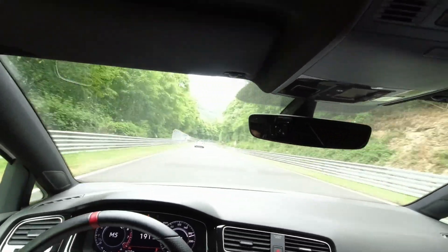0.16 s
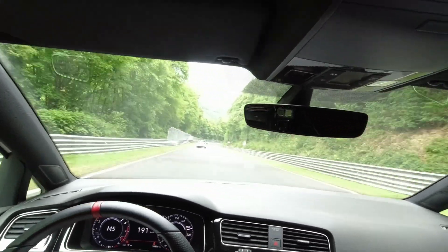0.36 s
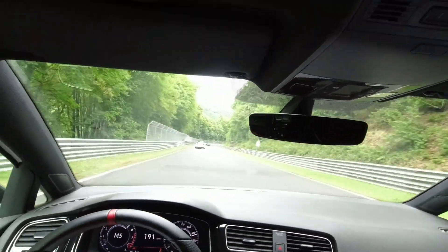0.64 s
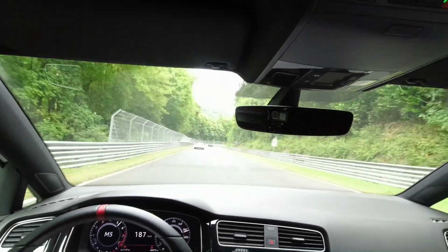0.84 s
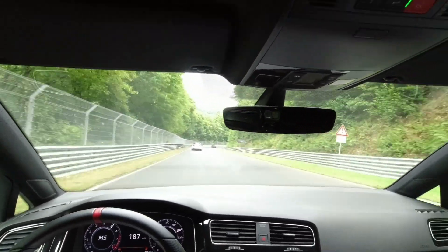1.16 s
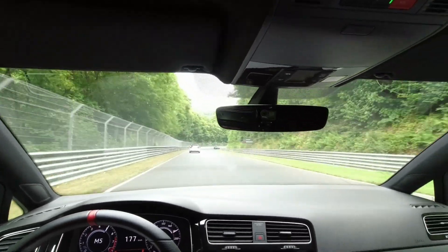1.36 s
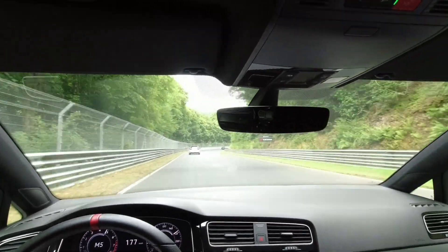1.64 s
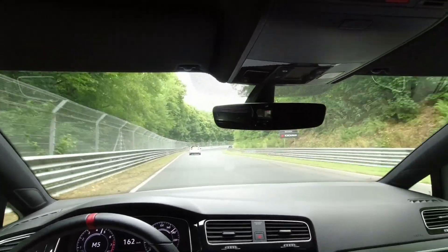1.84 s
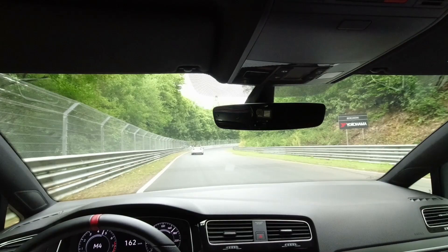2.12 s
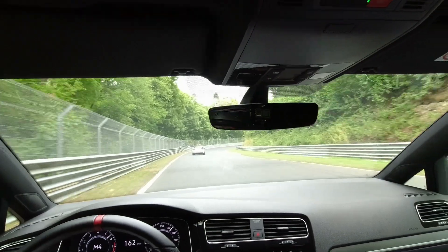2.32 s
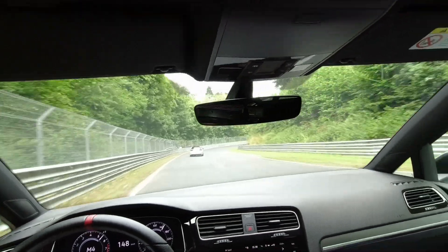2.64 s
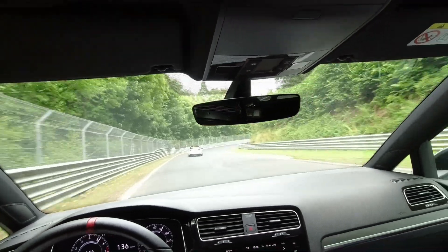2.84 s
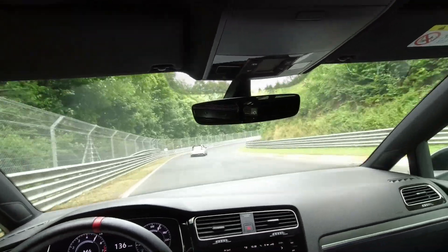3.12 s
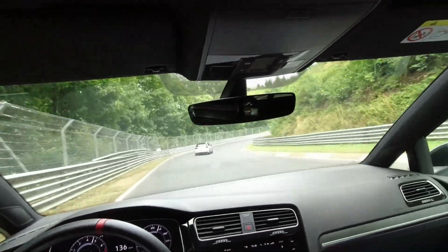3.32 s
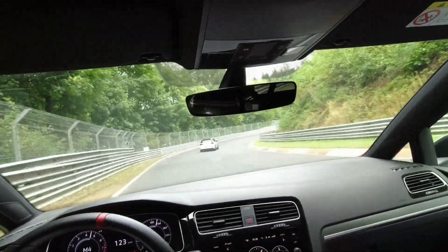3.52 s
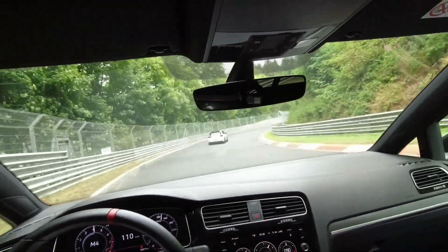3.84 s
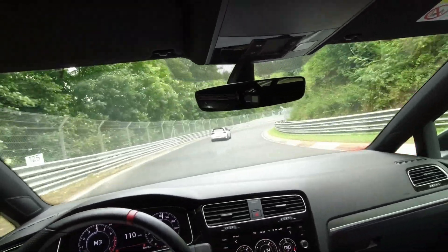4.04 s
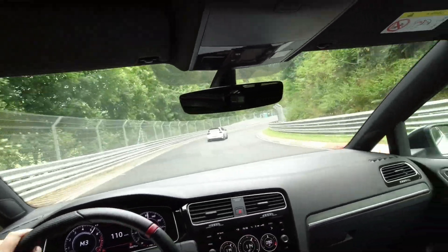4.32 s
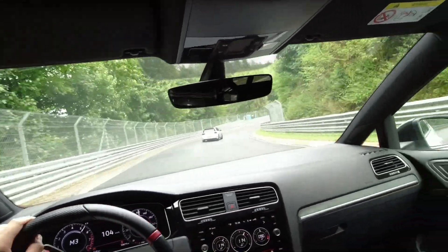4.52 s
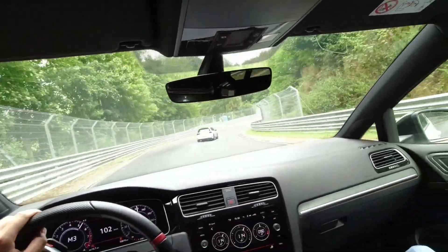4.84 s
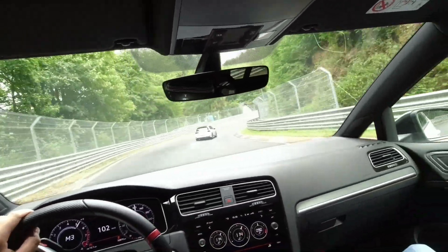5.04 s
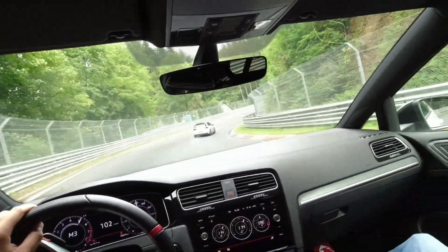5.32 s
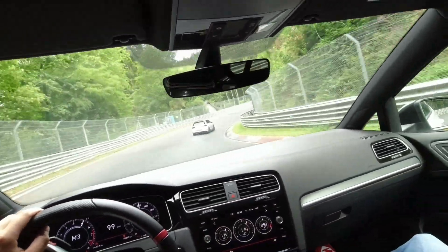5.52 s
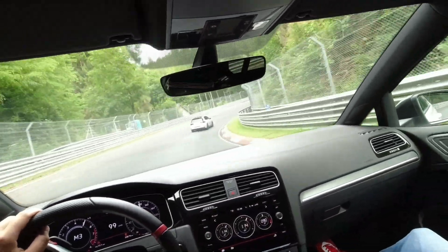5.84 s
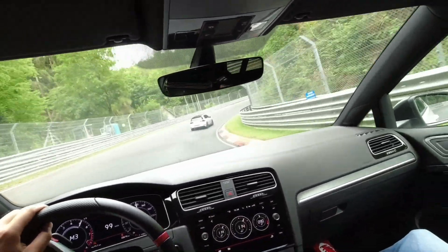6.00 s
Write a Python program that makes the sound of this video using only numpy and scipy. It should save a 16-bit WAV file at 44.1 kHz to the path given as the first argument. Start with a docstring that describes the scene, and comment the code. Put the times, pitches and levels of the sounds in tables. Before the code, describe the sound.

Heard from a car cabin: engine drones at speed, drops into braking, rises through two downshifts, then tyres howl in a bend amid rattling trim.

```python
"""Inside a four-cylinder turbo car on a racetrack: first full throttle, with a droning panel and thin high tones.
The driver lifts off and brakes hard, and two downshifts pull the engine speed up. In a bend the tyres howl as
their tread sticks and slips, and the throttle opens again. The engine is a sum of wavering tones tied to the
crankshaft. All along, coloured noise makes road rumble and wind, bumps boom and loose trim rattles."""
import sys
import numpy as np
from scipy import signal
from scipy.fft import rfft, irfft, next_fast_len
from scipy.io import wavfile
from scipy.ndimage import map_coordinates

SR = 44100
rng = np.random.default_rng(int(sys.argv[2]) if len(sys.argv) > 2 else 0)


def waveform_to_disk(signal):
    """Save audio, clipped to [-1, 1], as 16-bit WAV at the path in sys.argv[1]."""
    frames = np.transpose(np.atleast_2d(signal))
    scaled = np.clip(frames, -1, 1) * 32767
    samples = np.round(scaled).astype(np.int16)
    wavfile.write(sys.argv[1], SR, samples)


N = 272097  # length in samples

# Road speed. Each row: time in seconds, speed in km/h.
ROAD_SPEED = [(0, 189.1), (.43, 191.1), (.5, 188), (1.2, 179.1), (1.85, 160.9), (2.6, 146.1), (2.9, 136.9),
              (3.3, 125.6), (3.75, 120), (4.25, 116.5), (5.4, 106), (5.95, 107.5), (6.17, 111.8)]
TOP_KMH = 190
TOP_GEAR = .477  # crankshaft turns a second per km/h
# Each row: start in seconds, crankshaft turns a second per km/h in the new gear.
GEAR_CHANGES = [(2.25, .623), (4.05, .785)]
SHIFT_S = .18  # time in which the engine is pulled up to the new gear

# Throttle pedal: times in seconds, then loudness in relative dB when wide open, shut, and part open.
LIFT_OFF, CLOSING_S, BACK_ON, OPENING_S = .43, 0.07, 5.39, 0.46
FULL_DB, SHUT_DB, PART_DB = -45, -78.5, -54
# Loudness of engine braking. Each row: time in seconds, relative dB.
ENGINE_BRAKING = [(.43, -69), (.5, -56), (1.0, -53.5), (1.2, -50), (1.7, -53), (1.9, -55.5), (2.42, -53.5),
                  (2.55, -54), (2.75, -62), (2.95, -62), (3.02, -47), (3.22, -46), (3.3, -58), (3.4, -72),
                  (3.75, -55.5), (4.25, -56.5), (5.0, -60), (5.7, -53.5), (5.95, -73)]

# Wind rushing past. Each row: frequency in Hz, relative dB per Hz.
RUSH_SPECTRUM = [(350, -31), (600, -4), (702, -7.5), (837, -0.5), (896, -2.5), (1010, -3), (1120, -4),
                 (1230, -8.5), (1500, -10), (1730, -15.5), (2260, -19.5), (3050, -36), (3960, -37),
                 (6710, -120)]
# Wind hissing at the seals. Each row: frequency in Hz, relative dB per Hz.
HISS_SPECTRUM = [(1500, -32.5), (2600, -0.5), (3200, -6), (4000, -12.5), (5000, -16.5), (6300, -25.5),
                 (8000, -28), (9500, -27), (11000, -35.5), (12800, -37), (13300, -48.5), (15500, -51)]
# Base level at top speed, and loss each time the speed halves, both in dB.
ROAR_DB, ROAR_LOSS_DB, RUSH_DB, RUSH_LOSS_DB, HISS_DB, HISS_LOSS_DB = -35.5, 3.5, -48, 5.5, -67, 5.5
BOOST_DB = 8  # extra hiss at the very start, gone by lift-off
BEND, TURN_IN_S = 4.54, 0.36  # the bend: start and rise in seconds
BEND_RUSH_DB, BEND_ROAR_DB = 3.5, 1.5  # gains in the bend: wind rush, and roar of the loaded tyres

# What the road surface shakes. Each row: time in seconds, chassis level in dB, cabin boom level in dB.
ROAD_SHAKE = [(.05, -25, -32.5), (.31, -38, -31), (.41, -32, -41), (.55, -35.5, -48), (.75, -33.5, -37),
              (1.0, -29, -32.5), (1.13, -41.5, -36.5), (1.5, -38, -36.5), (2.37, -37, -36.5),
              (2.65, -35, -31.5), (2.89, -37, -38), (3.92, -35.5, -37), (4.35, -42, -41), (5.24, -36, -41),
              (5.5, -38.5, -42), (6.17, -43, -42.5)]
# Shaken chassis. Each row: frequency in Hz, relative dB per Hz.
CHASSIS_SPECTRUM = [(8.8, -33), (15, -4.5), (32, 0.5), (59, -6.5), (90, -9.5), (120, -36), (200, -120)]
# Booming cabin air. Each row: frequency in Hz, relative dB per Hz.
BOOM_SPECTRUM = [(35, -37), (60, -18.5), (91, 3.5), (124, -3), (150, -13.5), (200, -45), (330, -120)]
# Tyre roar. Each row: frequency in Hz, relative dB per Hz.
ROAR_SPECTRUM = [(68, -22.5), (115, -1), (151, -1.5), (177, -2), (248, -9.5), (279, -13.5), (345, -11),
                 (394, -12), (491, -16.5), (539, -20.5), (621, -31), (750, -31.5), (980, -66), (1650, -120)]
# Ringing body panels, passed twice. Each row: frequency in Hz, width of one pass in Hz, dB of one pass.
PANEL_MODES = [(144.2, 12, -1), (198.4, 9, -1), (245.3, 18, -2.5), (344.7, 14, -4), (420.4, 4.2, -4),
               (833.4, 34, -8.5)]
ROAR_FOLLOWS = .3  # share of the chassis level swings (in dB) that the tyre roar follows

# Bumps that ring the body. Each row: start in seconds, length in seconds, first Hz, last Hz, peak dB.
BODY_BUMPS = [(0.017, 0.018, 28, 27.2, -35), (.1, 0.16, 112.4, 111.5, -24),
              (0.348, 0.073, 103.2, 101.2, -21), (0.367, 0.087, 30.5, 30.1, -32),
              (0.702, .1, 99.2, 100, -30), (.882, 0.033, 99, 103.5, -15), (0.883, 0.19, 103.6, 102, -14.5),
              (0.935, 0.023, 27.9, 28.3, -17), (1.001, 0.033, 29.8, 30, -15),
              (1.12, 0.25, 139.8, 140.7, -33), (1.72, 0.17, 153.2, 150.8, -30),
              (1.85, 0.22, 146.3, 151.6, -26.5), (2.082, 0.28, 198.8, 199.5, -37.5),
              (2.48, 0.2, 112, 90, -25), (2.63, 0.17, 196.4, 200.5, -39.5),
              (2.721, 0.067, 30.2, 30.3, -25.5), (3.05, 0.14, 109, 111.4, -34),
              (3.11, 0.3, 139.8, 133.3, -35.5), (3.48, 0.13, 76.6, 115, -27),
              (3.58, 0.099, 138.4, 152, -31.5), (3.901, 0.12, 97.4, 92.6, -44.5),
              (5.148, 0.19, 102.3, 101.4, -33), (5.435, 0.05, 172.6, 174, -26),
              (5.447, 0.033, 367, 353, -30), (5.457, 0.039, 29.4, 29.6, -21.5),
              (5.5, 0.028, 178, 183, -27.5)]

# Trim rattles. Each row: start in seconds, then strength of clack, knock and tinkle in relative dB.
TRIM_RATTLES = [(0.462, -51, -58.5, -70), (0.868, -61, -66, -94.5), (1.002, -58, -66, -91.5),
                (2.419, -56.5, -56.5, -73), (2.793, -55, -58.5, -85), (2.827, -57.5, -65.5, -70),
                (2.928, -37.5, -58, -77.5), (2.961, -49.5, -69, -90), (2.996, -54.5, -68.5, -85),
                (3.334, -55.5, -66, -84), (3.6334, -55.5, -48.5, -84.5), (3.66, -66, -55, -90),
                (3.705, -72, -58, -93), (3.98, -65, -69, -85), (4.257, -73, -70, -76),
                (4.768, -71, -66, -73.5), (4.847, -58, -54, -86), (4.8774, -59.5, -53.5, -74),
                (5.007, -66, -56.5, -73.5), (5.1213, -61.5, -60, -75.5), (5.132, -53, -51.5, -81),
                (5.343, -77.5, -62, -74.5), (5.385, -63.5, -61.5, -73), (5.422, -63, -47, -81),
                (5.433, -45, -38, -58.5), (5.465, -59.5, -47.5, -83.5), (5.492, -62, -55, -89),
                (5.871, -68.5, -70, -85)]
# Clacking trim, before extra damping. Each row: frequency in Hz, width in Hz, relative dB.
CLACK_MODES = [(2470, 400, -12), (3002, 26, 4), (3455, 50, 7), (3650, 900, -8), (3812, 30, 10),
               (3990, 28, 6), (4675, 45, 2), (5191, 30, 3), (5444, 32, 1), (6200, 700, -14),
               (7000, 900, -27), (8600, 900, -25)]
# Knocking trim, before extra damping. Each row: frequency in Hz, width in Hz, relative dB.
KNOCK_MODES = [(700, 390, 1), (1100, 400, 4.5), (1520, 130, 8), (1620, 77, 15.5), (1825, 66, 13),
               (2070, 74, 5.5), (2480, 320, 10), (3000, 200, 11.5), (3400, 160, 5), (4100, 250, 0),
               (4700, 150, -3), (5063, 34, 5.5), (5450, 150, -7)]
# Light tinkling trim. Each row: frequency in Hz, width in Hz, relative dB.
TINKLE_MODES = [(7640, 630, 2), (8850, 720, 6.5), (9150, 340, 15), (10640, 710, 4), (12300, 900, -5.5),
                (14400, 900, -4.5)]
# Shake time in seconds at a knock of -69 dB; it grows by about this share for each dB more.
RATTLE_S, RATTLE_GROWS = 0.04, 0.01

# Slides of the tread. Each row: start in seconds, length in seconds, first Hz, last Hz, level in dB.
TYRE_SLIDES = [(4.602, .15, 815, 822, -51), (4.783, .13, 825, 892.5, -46.5), (5.02, .35, 812, 841, -48),
               (5.369, .27, 868.5, 891, -47.5), (5.633, .21, 898.6, 925.5, -45),
               (5.824, 0.33, 1010, 1032, -51.5)]
BITE_S, GROWS_DB, LET_GO_S = 0.05, 1.5, 0.033  # a slide starts, grows over its length, and stops

# Crankshaft tones. Each row: multiple of crank speed, relative dB under throttle, relative dB when braking.
CRANK_ORDERS = [(2, -9, -10.5), (3, -5, -9.5), (3.5, -3, -16), (4, -2.5, -16.5), (4.5, -10.5, -12.5),
                (5, -13, -12.5), (5.5, -9, -13), (6, -8, -2), (6.5, -14, -27), (7, -2, -21.5),
                (8, -10.5, -26.5), (9, -11.5, -27), (10, -7, -32.5), (11.2, -4, -32), (13.5, -13.5, -36.5)]
# Bulkhead resonances, passed twice. Each row: frequency in Hz, width of one pass in Hz, dB of one pass.
BULKHEAD_MODES = [(185, 107, 0), (328.3, 44.6, 3.5), (464.3, 133, -2.5), (621, 60, -0.5), (1160, 1100, -6)]
# Air drawn in. Each row: frequency in Hz, relative dB per Hz.
INTAKE_SPECTRUM = [(300, -37.5), (550, -6.5), (1000, 3.5), (1500, -7), (2200, -9.5), (3500, -31),
                   (6000, -62)]
# A panel that drones at top speed. Each row: time in seconds, frequency in Hz, middle level in dB.
PANEL_DRONE = [(0, 356.6, -38.5), (.08, 352, -34), (.22, 351.3, -40), (.34, 354.2, -60), (.43, 355.7, -37),
               (.55, 345, -36), (.66, 346.7, -39.5), (.76, 355.3, -56), (.9, 350, -94.5)]
# Gear mesh under load. Each row: time in seconds, frequency in Hz, middle level in dB.
GEAR_WHINE = [(.4, 1803, -59), (.47, 1800, -95)]
# A thin tone under load. Each row: time in seconds, frequency in Hz, middle level in dB.
THIN_WHISTLE = [(0, 1145, -60), (.04, 1145, -49), (.16, 1145, -50), (.21, 1136, -66), (.42, 1136, -66),
                (.47, 1130, -95)]

# How alike left and right are. Each row: frequency in Hz, likeness (1 is identical).
LEFT_RIGHT_LIKENESS = [(30, .9994), (90, .9997), (180, .9984), (320, .977), (500, .975), (900, .89),
                       (1500, .6), (2600, .25), (5000, .25), (9000, .3), (13000, .7)]
# How far left runs ahead of right. Each row: frequency in Hz, lead in radians.
LEFT_LEAD = [(100, 0), (950, 0.065), (1500, -0.67), (2800, -1.1), (5500, -1.6), (9000, -1.3),
             (12000, -0.77)]
TOP_HZ = 15050  # nothing is kept from here up


def amp(db):
    """Turn dB into gain."""
    return 10 ** (np.asarray(db) / 20)


def unit(x):
    """Scale to an average strength (rms) of 1."""
    return x / np.sqrt(np.mean(x ** 2) + 1e-20)


def along(points, hz):
    """Read a curve of (Hz, value) points on a logarithmic frequency axis."""
    f, v = np.transpose(points)
    return np.interp(np.log(hz + 1), np.log(f + 1), v)


def curves(rows):
    """Draw one value per sample for each column after the time."""
    s, *columns = np.transpose(rows)
    return [np.interp(np.arange(N) / SR, s, column) for column in columns]


def ramp(start, length):
    """Rise from 0 at start to 1 at start + length."""
    return np.clip((np.arange(N) / SR - start) / length, 0, 1)


def wobble(rate):
    """Make a smooth random curve with this many knots a second."""
    knots = rng.standard_normal(int(N * rate / SR) + 4)
    return map_coordinates(knots, [np.arange(N) * rate / SR])


def filtered(x, response):
    """Multiply the spectrum of x by a response, given as a function of frequency."""
    m = next_fast_len(N + SR // 2)
    return irfft(rfft(x, m) * response(np.fft.rfftfreq(m, 1 / SR)), m)[..., :N]


def modes(table, damping=1):
    """Response of resonances that ring after a blow; more damping spreads the same energy wider."""
    def response(f):
        total = 0
        for k, (centre, width, db) in enumerate(table):
            top = 1j * f * width * np.sqrt(damping)
            bottom = centre * centre - f * f + 1j * f * width * damping
            total = total + (-1) ** k * amp(db) * top / bottom  # signs alternate
        return total
    return response


def noise(spectrum, evenness=0):
    """A pair of coloured noises; evenness above 0 flattens their swells."""
    pair = unit(filtered(rng.standard_normal((2, N)), lambda hz: amp(along(spectrum, hz))))
    swell = np.abs(signal.hilbert(pair, next_fast_len(N))[:, :N]) + 0.059
    return unit(pair / swell ** evenness)


def halvings():
    """How many times the road speed has halved since top speed."""
    return np.log2(TOP_KMH / curves(ROAD_SPEED)[0])


def wind():
    """Air rushes over pillars and mirrors and hisses at the seals, louder at higher speed."""
    rush_db = RUSH_DB - RUSH_LOSS_DB * halvings() + BEND_RUSH_DB * ramp(BEND, TURN_IN_S)
    hiss_db = HISS_DB - HISS_LOSS_DB * halvings() + BOOST_DB * (1 - ramp(0, LIFT_OFF))
    rush = amp(rush_db + .7 * wobble(7)) * noise(RUSH_SPECTRUM)
    hiss = amp(hiss_db + 1.1 * wobble(14)) * noise(HISS_SPECTRUM)
    return rush + hiss


def road():
    """The surface shakes the chassis, drives the air boom of the cabin, roars in the tyres and rings the panels."""
    chassis_db, boom_db = curves(ROAD_SHAKE)
    roar_db = ROAR_DB - ROAR_LOSS_DB * halvings()
    roar_db = roar_db + ROAR_FOLLOWS * (chassis_db - chassis_db.mean())
    roar_db = roar_db + BEND_ROAR_DB * ramp(BEND, TURN_IN_S)
    chassis = amp(chassis_db) * noise(CHASSIS_SPECTRUM, evenness=0.24)
    boom = amp(boom_db) * noise(BOOM_SPECTRUM, evenness=0.77)
    panels = unit(filtered(rng.standard_normal((2, N)), lambda hz: modes(PANEL_MODES)(hz) ** 2))
    roar = amp(roar_db) * (noise(ROAR_SPECTRUM, evenness=0.046) + amp(-9.5) * panels)
    return chassis + boom + roar


def bumps():
    """Each bump swells and fades in one body mode, which may glide as the springs load."""
    out = np.zeros(N + SR)
    for s, length, first_hz, last_hz, db in BODY_BUMPS:
        t = np.arange(int(length * SR)) / SR
        shape = np.sin(np.pi * (t / length) ** 0.94) ** 0.99
        cycles = t * (first_hz + (last_hz - first_hz) * t / length / 2)
        out[round(s * SR):][:len(t)] += amp(db) * shape * np.sin(2 * np.pi * cycles)
    return out[:N]


def rattles():
    """Each rattle is a short spray of tiny contacts that sets trim resonances clacking, knocking and tinkling."""
    out = np.zeros((2, N + SR))
    t = np.arange(8192) / SR
    f = np.fft.rfftfreq(len(t), 1 / SR)
    fade = np.clip(4 - t / .035, 0, 1)
    for s, clack_db, knock_db, tinkle_db in TRIM_RATTLES:
        length = RATTLE_S * np.exp(RATTLE_GROWS * (knock_db + 69.0))
        mostly_clack = clack_db - knock_db > 14
        onset = 1 - np.exp(-t / (0.004 if mostly_clack else 0.007))
        shake = amp(-20 * (t / length) ** 1.4)
        tail = 0.3 * amp(-60 * t / 0.3)
        burst = onset * (shake + tail) * fade
        # uneven random sizes make single contacts stand out
        spray = rng.standard_normal((2, len(t))) * amp(4.3 * rng.standard_normal((2, len(t))))
        spray[1] *= 0.4  # close and small: mostly alike in both ports
        # the clack rings clearly where it far outweighs the knock; the knock rings clearer when strong
        clack = amp(clack_db) * modes(CLACK_MODES, 1.3 if mostly_clack else 12)(f)
        knock = amp(knock_db) * modes(KNOCK_MODES, 3 if knock_db > -44 else 7)(f)
        tinkle = amp(tinkle_db) * modes(TINKLE_MODES)(f)
        # the tinkle swells in softly and stops sooner
        soft_burst = burst ** 1.4 * (1 - np.exp(-t / 0.0067))
        spectrum = rfft(burst * spray) * (clack + knock) + rfft(soft_burst * spray) * tinkle
        out[:, round(s * SR):][:, :len(t)] += irfft(spectrum)
    return out[:, :N]


def howl():
    """Tread blocks of several tyres stick and slip in the bend: fuzzy, fluttering tones."""
    pitch_points, gain = [], 0
    for s, length, first_hz, last_hz, db in TYRE_SLIDES:
        pitch_points += [(s, first_hz), (s + length - .02, last_hz)]
        growth = amp(db - GROWS_DB * (1 - ramp(s, length)))
        gain = gain + growth * ramp(s, BITE_S) * (1 - ramp(s + length - LET_GO_S, LET_GO_S))
    hz, = curves(pitch_points)
    voices = 0
    # each voice: pitch ratio, level in relative dB, slow swell in dB
    for ratio, level_db, swell_db in [(.92, -10, 3), (.962, -8, 2.5), (1, -2.5, 1.3),
                                      (1.045, -8, 2.5), (1.14, -10, 3)]:
        flutter = amp(level_db + 2.9 * wobble(30) + swell_db * wobble(11))
        fuzzy_hz = hz * ratio + 11 * wobble(45) + 4 * wobble(12)
        voices = voices + flutter * np.sin(2 * np.pi * np.cumsum(fuzzy_hz) / SR)
    return gain * unit(voices)


def hum(rows, waver):
    """A lone tone whose level and phase waver."""
    hz, db = curves(rows)
    phase = 2 * np.pi * np.cumsum(hz) / SR + waver * wobble(9)
    return amp(db + 1.6 * wobble(27)) * np.sin(phase)


def pedals():
    """Crankshaft speed follows road speed through the gears; also throttle dB and engine braking dB."""
    gear = np.full(N, TOP_GEAR)
    for s, ratio in GEAR_CHANGES:
        gear = gear + (ratio - gear) * ramp(s, SHIFT_S)
    throttle_db = FULL_DB + (SHUT_DB - FULL_DB) * ramp(LIFT_OFF, CLOSING_S)
    throttle_db = throttle_db + (PART_DB - SHUT_DB) * ramp(BACK_ON, OPENING_S)
    return gear * curves(ROAD_SPEED)[0], throttle_db, curves(ENGINE_BRAKING)[0]


def engine():
    """Unsteady crankshaft tones, loudest where they cross a bulkhead resonance; open throttle breathes noise."""
    hz, throttle_db, braking_db = pedals()
    throttle, braking = amp(throttle_db), amp(braking_db)
    turn = 2 * np.pi * np.cumsum(hz) / SR
    orders = 0
    for multiple, on_db, off_db in CRANK_ORDERS:
        level = throttle * amp(on_db) + braking * amp(off_db)
        unsteady = amp(0.84 * wobble(4.8) + 1.8 * wobble(22))
        phase = multiple * turn + (.35 + 0.053 * multiple) * wobble(14) + 2 * np.pi * rng.random()
        orders = orders + level * unsteady * np.sin(phase)
    through_bulkhead = amp(9) * filtered(orders, lambda f: modes(BULKHEAD_MODES)(f) ** 2)
    lone_tones = hum(PANEL_DRONE, waver=0.36) + hum(GEAR_WHINE, waver=1.0) + hum(THIN_WHISTLE, waver=0.89)
    strokes = 1 + 0.8 * np.sin(2 * turn)  # two intake strokes a turn
    breath = throttle * amp(-6.0) * strokes * noise(INTAKE_SPECTRUM)
    return through_bulkhead + lone_tones, breath


def ports(a, b):
    """Two close microphone ports: a shared part, an opposed part set by their likeness, and a small lag."""
    def blend(hz):
        angle = np.arccos(np.clip(along(LEFT_RIGHT_LIKENESS, hz), -1, 1)) / 2
        return np.array([np.cos(angle), np.sin(angle)])

    def lag(hz):
        return np.exp(.5j * np.outer([1, -1], along(LEFT_LEAD, hz)))

    mid, side = filtered(np.array([a, b]), blend)
    return filtered(np.array([mid + side, mid - side]), lag)


def scene():
    """Tones reach the opposed part as a delayed cabin reflection; noises fill both parts."""
    engine_tones, breath = engine()
    tones = engine_tones + howl() + bumps()
    shared, opposed = road() + wind() + breath + rattles()
    reflection = np.pad(tones, (310, 0), "reflect")[:N]  # 310 samples, about 7 ms, late
    start = ramp(0, .004)  # no click at the first sample
    return ports(start * (shared + tones), start * (opposed + reflection))


def record(dry):
    """Keep only what lies below the upper band limit."""
    return filtered(dry, lambda hz: hz < TOP_HZ)


dry = scene()
out = record(dry)
waveform_to_disk(out)
```